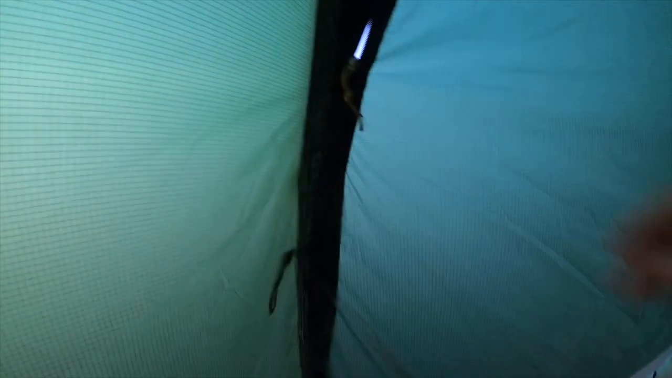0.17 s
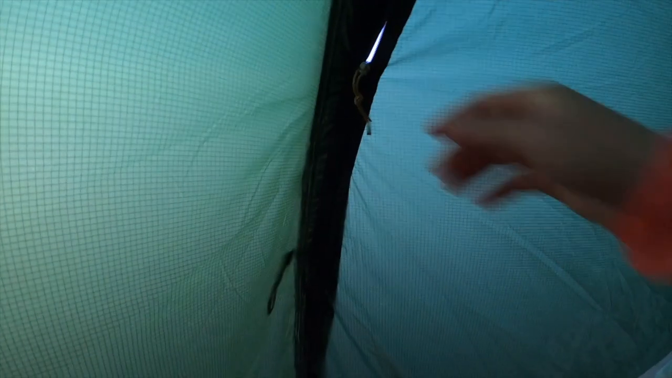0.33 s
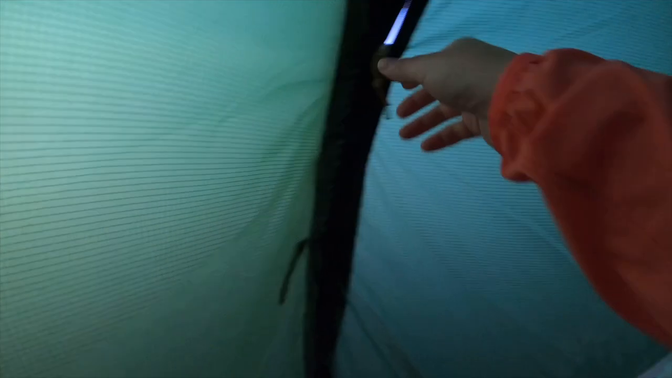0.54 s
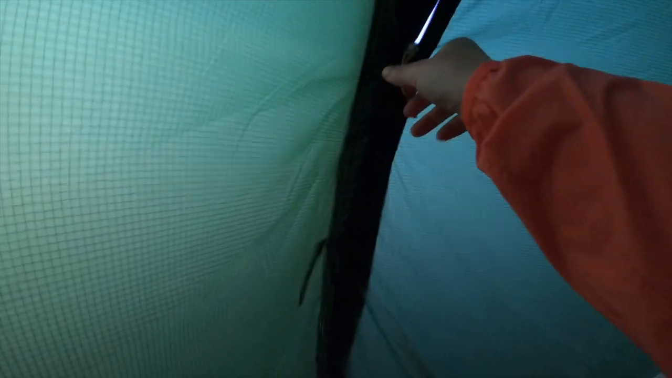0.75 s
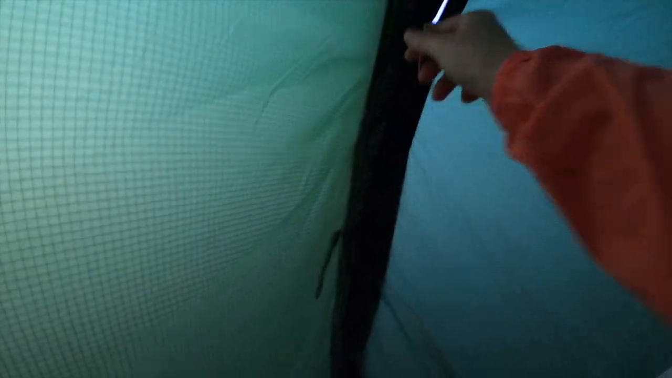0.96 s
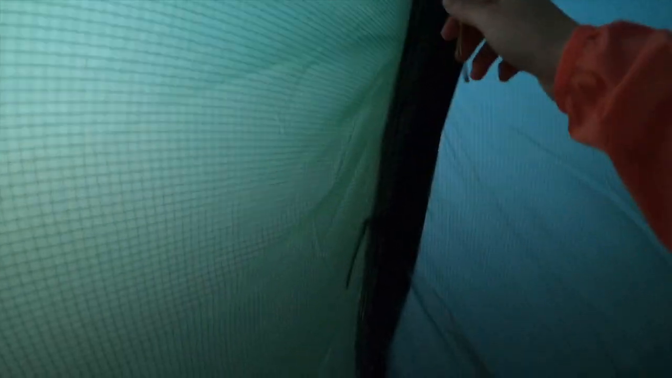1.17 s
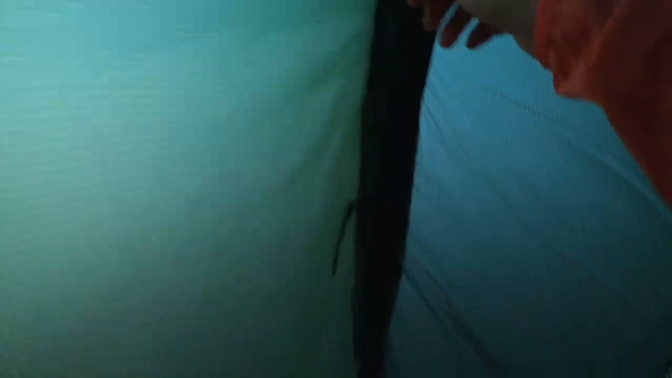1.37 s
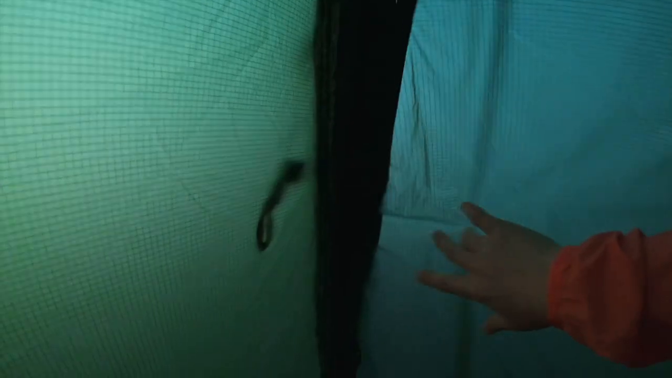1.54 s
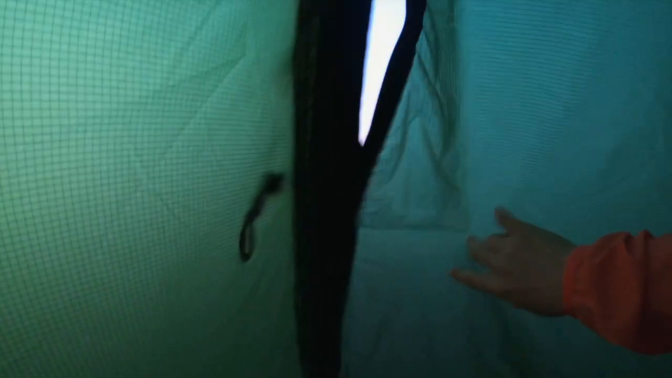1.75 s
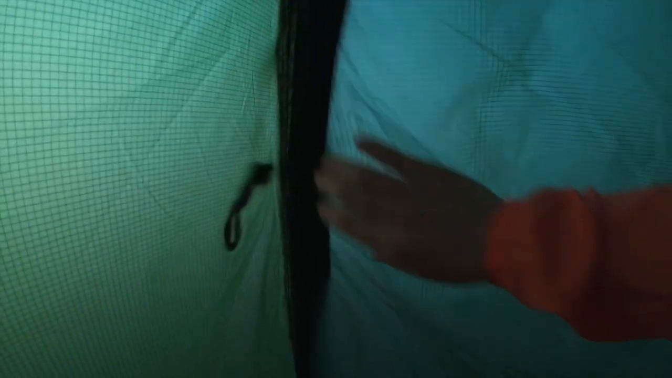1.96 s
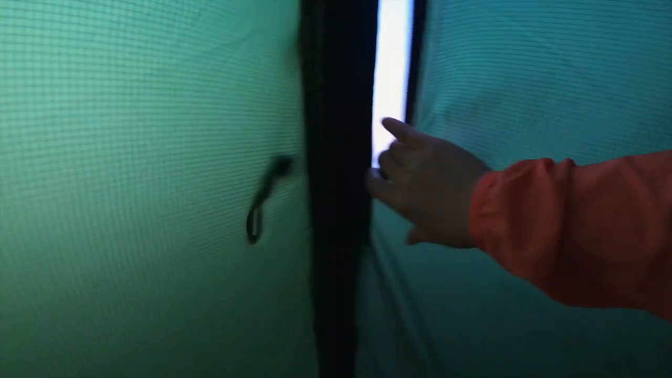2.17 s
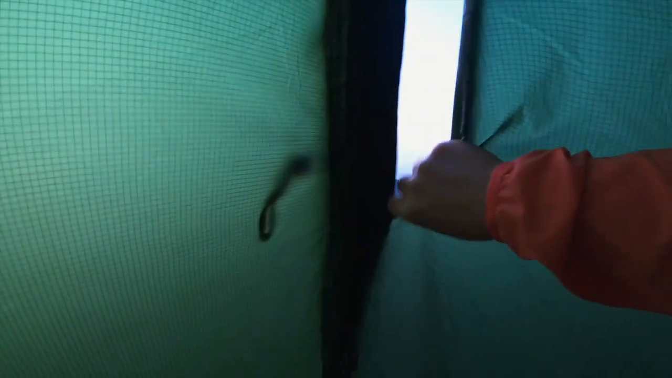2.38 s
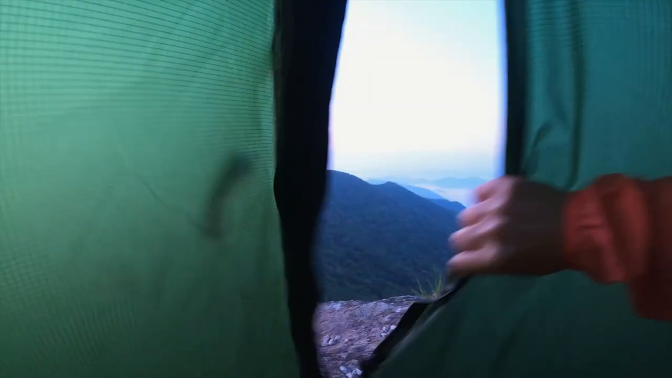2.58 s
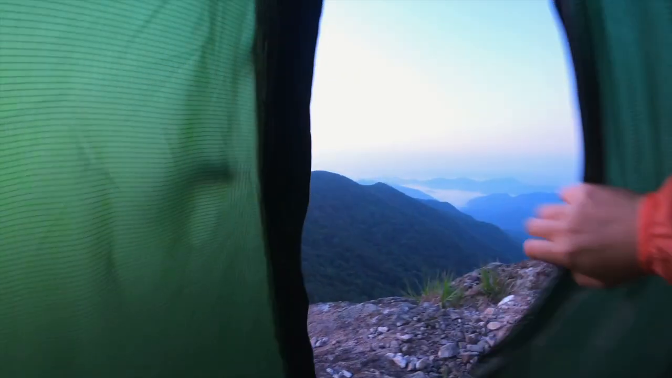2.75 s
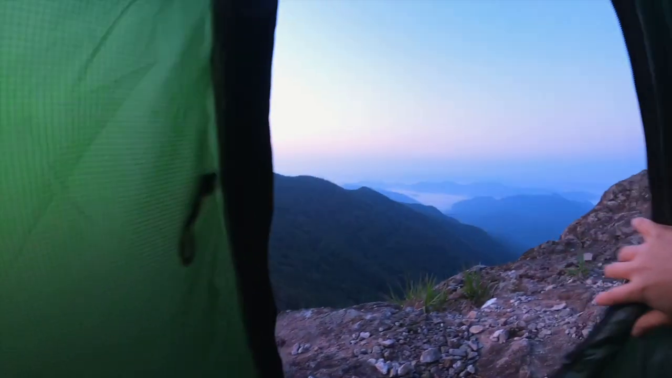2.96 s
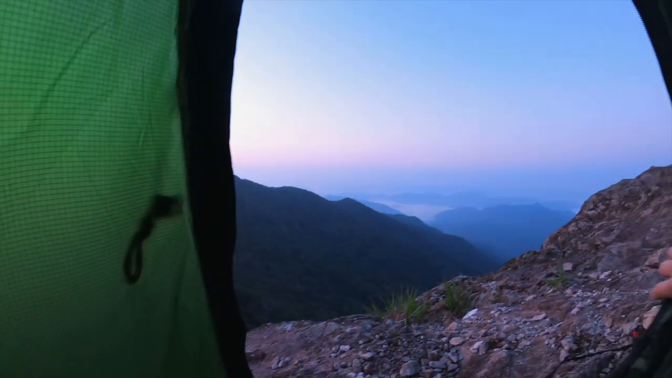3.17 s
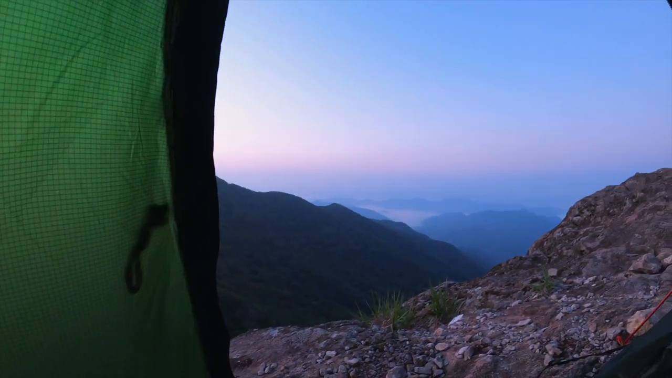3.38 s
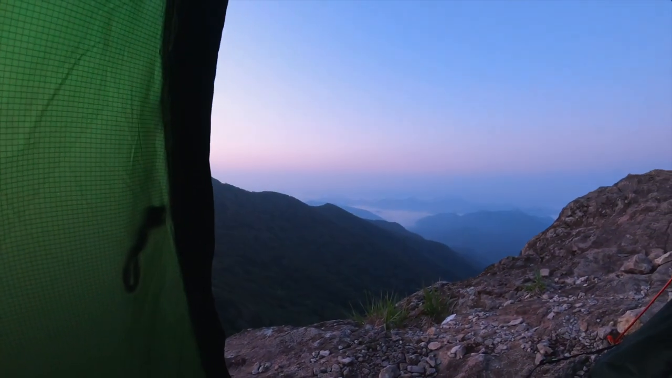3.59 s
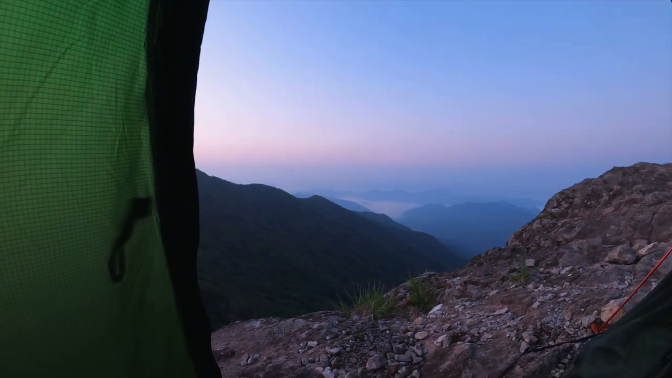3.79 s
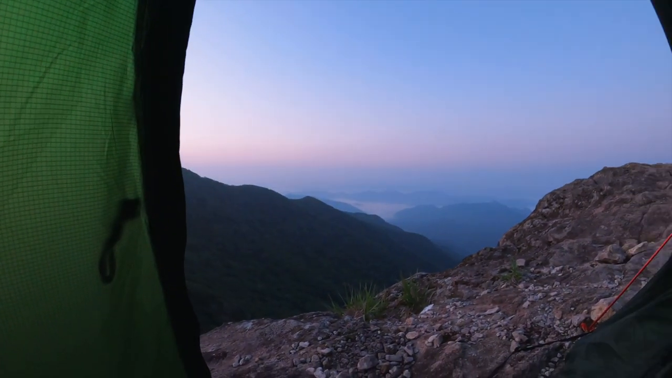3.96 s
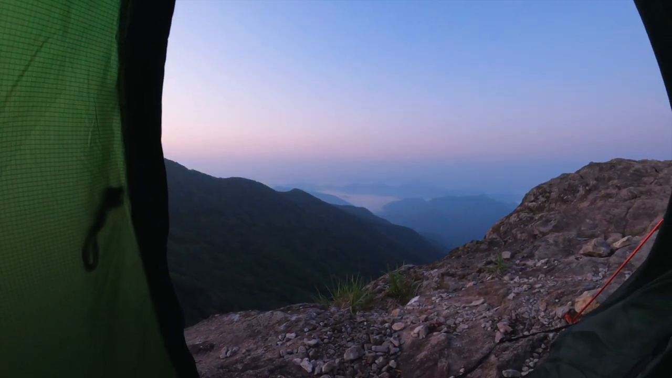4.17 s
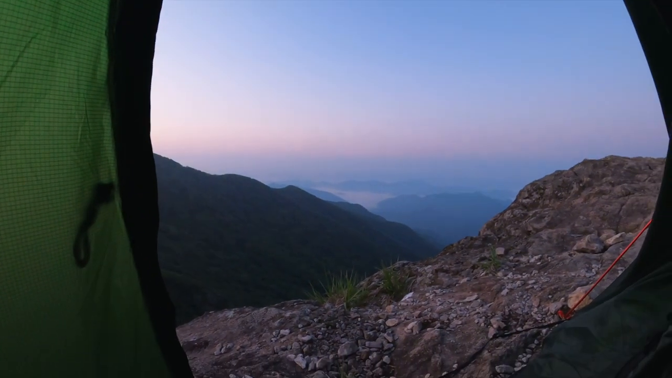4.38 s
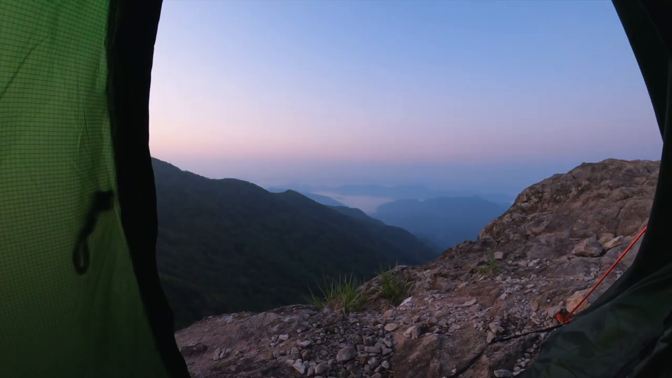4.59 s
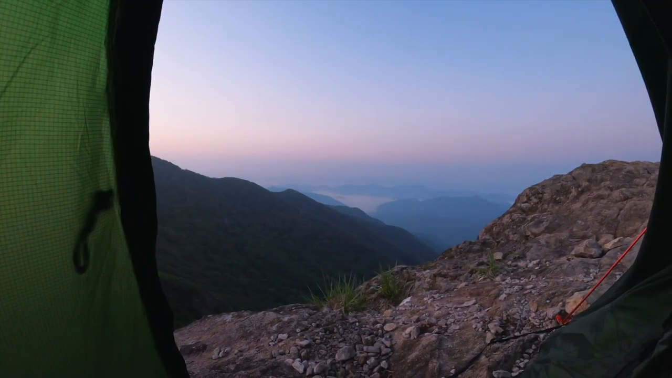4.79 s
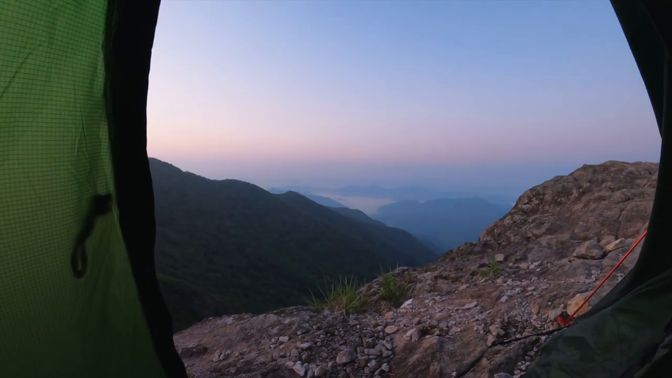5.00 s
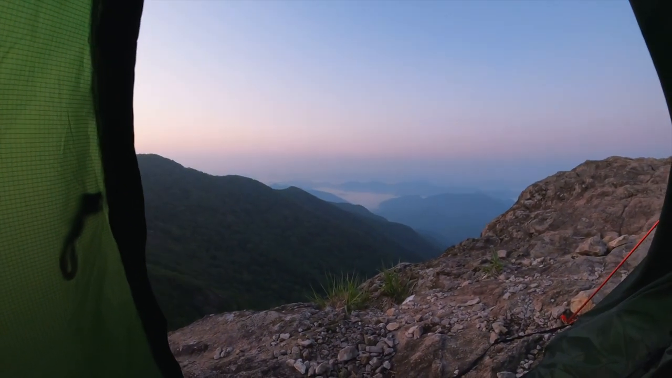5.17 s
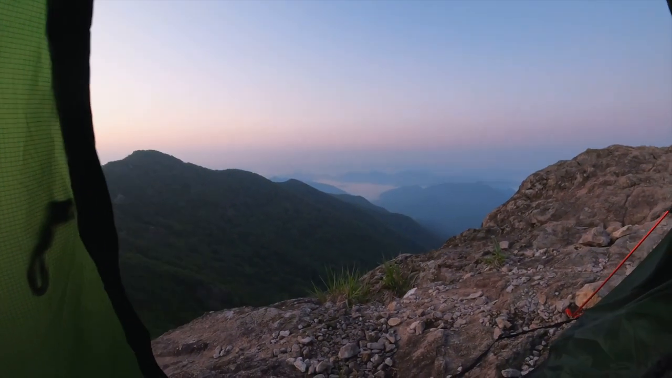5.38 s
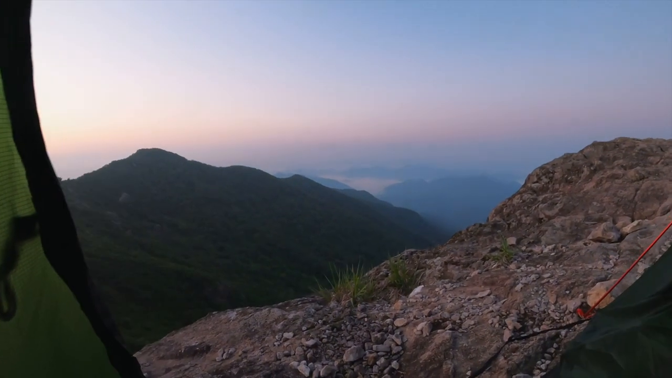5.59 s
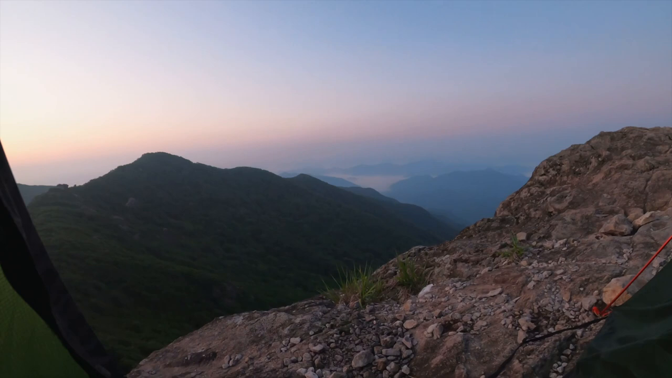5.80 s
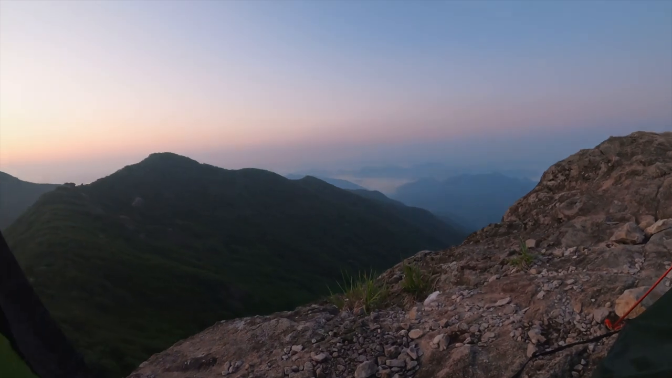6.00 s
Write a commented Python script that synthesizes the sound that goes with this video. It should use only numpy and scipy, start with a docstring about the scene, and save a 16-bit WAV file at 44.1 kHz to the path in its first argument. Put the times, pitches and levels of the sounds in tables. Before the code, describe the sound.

Quiet birdsong and faint nylon rustle, then a tent zipper rips open in sharp snapping bursts with booming, flapping cloth, settling back to soft swishes and birds.

```python
"""Sharp zipper snaps and booming, swishing nylon: a hand shakes a tent door and parts it, birds calling beyond.
Snaps are bursts of damped sines with a noise crack and rattle, one per tooth that the slider jerks over.
Cloth is shaped stereo noise swelling with each tug; its crackles and low knocks are clumps of damped grains.
Songbirds are gliding sines with a faint decaying smear from the mountain slope."""
import sys
import numpy as np
from scipy import signal
from scipy.fft import rfft, irfft, next_fast_len
from scipy.io import wavfile
from scipy.ndimage import uniform_filter1d, map_coordinates

SR = 44100
rng = np.random.default_rng(int(sys.argv[2]) if len(sys.argv) > 2 else 0)


def inscribe(sig):
    """Save sig as 16-bit PCM at rate SR to the path in sys.argv[1].

    A 1-D sig is mono; a 2-D sig holds one channel per row.
    Samples are clipped to [-1, 1] before scaling.
    """
    pcm = np.round(np.clip(np.atleast_2d(sig).T, -1, 1) * 32767)
    wavfile.write(sys.argv[1], SR, pcm.astype(np.int16))


N = 266466

# left-right balance of cloth and zipper, jumping near 1.45 s: (time [s], left over right [dB])
SIDE_DB = [(0, -7.5), (1.15, -7.5), (1.44, -9.5), (1.46, -0.5), (2.9, -0.5), (5.2, 0.5), (6.04, 4)]


def amp(db):
    """dB to gain."""
    return 10 ** (np.asarray(db) / 20)


def unit(x):
    """Scaled to rms 1."""
    return x / np.sqrt(np.mean(x ** 2) + 1e-20)


def along(points, hz):
    """(Hz, value) points interpolated on a log frequency axis."""
    f, v = np.transpose(points)
    return np.interp(np.log(hz + 1), np.log(f + 1), v, left=v[0], right=v[-1])


def curves(rows):
    """One value per sample for each column after the time."""
    s, *cols = np.transpose(rows)
    return [np.interp(np.arange(N) / SR, s, c) for c in cols]


def wobble(knots_per_s):
    """A smooth random curve through normal-distributed knots."""
    knots = rng.standard_normal(int(N * knots_per_s / SR) + 4)
    return map_coordinates(knots, [np.arange(N) * knots_per_s / SR])


def filtered(x, response):
    """x times a response of frequency."""
    m = next_fast_len(N + 8192)
    return irfft(rfft(x, m) * response(np.fft.rfftfreq(m, 1 / SR)), m)[..., :N]


def zipper():
    """Each tooth snaps as the slider passes; the snaps share the left-right balance and one treble roll-off."""
    # ring pitch sinks through the fast run, then partly recovers: (time [s], ring pitch [factor])
    ring_pitch_curve = [(0, 1.2), (2.46, 1.08), (2.49, 0.86), (2.55, 0.77), (2.7, 0.954)]
    # treble of all snaps: (frequency [Hz], gain [dB])
    snap_top = [(7000, 0.5), (8200, -14.5), (12000, -18), (15000, -22), (16000, -36)]
    out = np.zeros((2, N + SR))
    pan_db, ring_pitch = curves(SIDE_DB)[0], curves(ring_pitch_curve)[0]
    for s, *levels_db in teeth():
        start = round(s * SR) - 16
        ports = snap(levels_db, ring_pitch[start])
        side_db = pan_db[start] + rng.normal(0, 0.8)
        out[:, start:start + ports.shape[1]] += ports * amp(np.array([[.5], [-.5]]) * side_db)
    return filtered(out[:, :N], lambda hz: amp(along(snap_top, hz)))


def teeth():
    """A jerk drags the slider over one tooth or several in a row: (s, body dB, ring dB, knock dB)."""
    # slider jerks and lone snaps: (time [s], length [s], body [dB], ring [dB], knock [dB]), relative levels
    jerks = [(0.28, 0.0013, -33.5, -54, -65), (0.5075, 0.0014, -32.5, -45, -62),
             (0.5358, 0.0018, -31.5, -38.5, -33.5), (0.6718, 0.0017, -15.5, -17, -11.5),
             (0.7525, 0.0029, -40, -39, -35.5), (1.0771, 0.00076, -31.5, -57, -42.5),
             (1.462, 0.0019, -32, -37, -23.5), (1.4934, 0.00033, -19, -36, -26),
             (1.5152, 0.00096, -18, -53, -22.5), (1.6195, 0.0031, -25, -33, -27),
             (1.835, 0.000015, -28, -50, -24.5), (1.876, 0.001, -32, -27.5, -55),
             (2.065, 0.0015, -22, -26, -47), (2.1085, 0.0021, -24, -25, -27),
             (2.162, 0.00043, -36, -20, -12.5), (2.196, 0, -22, -35, -11), (2.222, 0, -40, -40, -18),
             (2.2691, 0.00097, -6, -12.5, -6.5), (2.2869, 0.0023, -3.5, -4, -23),
             (2.3185, 0, -34, -21, -47), (2.347, 0.00022, -7.5, -5.5, -39), (2.3586, 0.0019, -2.5, -2, -20),
             (2.3706, 0, -19, -15, -42), (2.375, 0, -20.5, -16, -53), (2.3824, 0.002, -5, -3, -15.5),
             (2.4265, 0, -5.5, -1.5, -27.5), (2.4389, 0, -10, 0.5, -38.5), (2.4465, 0.0017, -1.5, 3, -18),
             (2.4593, 0.0021, -4.5, 0.5, -16), (2.4681, 0.002, -8.5, 2, -10),
             (2.4736, 0.00088, -3, 0, -31.5), (2.476, 0.0026, -5.5, -0.5, -20.5), (2.4919, 0, -16, 0, -9.5),
             (2.495, .004, -7.5, -8.5, -17), (2.5065, 0.0017, -18, -12.5, -40),
             (2.5166, 0, -8.5, -6.5, -20), (2.518, 0.0012, -2, 1.5, -21.5), (2.5289, 0, -9, -6, -17.5),
             (2.53, 0.0016, -1.5, -0.5, -8.5), (2.5336, 0.0042, -9, -9.5, -10.5),
             (2.5403, 0.00077, -5.5, -10, -13), (2.543, 0.0024, -5, -11, -6.5),
             (2.7, 0.0007, -14.5, -38, -25), (2.7067, 0.0008, -13.5, -7.5, -22),
             (2.762, 0.00097, -17.5, -15, -35), (2.7687, 0.0034, -9.5, -13.5, -12.5),
             (2.777, 0, -7, -14, -20), (2.7796, 0.0012, -13.5, -21, -14), (2.973, 0.0015, -28, -8.5, -33),
             (4.584, 0.0036, -42.5, -44, -50), (5.988, 0.01, -40.5, -52, -41.5)]
    tooth_s, fade_db_per_tooth, scatter_db = .002, 0.1, 0.95
    passed = []
    for s, length_s, *levels_db in jerks:
        for k in range(1 + int(length_s / tooth_s + .4)):
            tooth_time_s = s + k * tooth_s * rng.uniform(0.92, 1.15)
            scatter = scatter_db * rng.standard_normal(size=3)
            passed.append((tooth_time_s, *(np.array(levels_db) - k * fade_db_per_tooth + scatter)))
    return passed


def snap(levels_db, ring_factor):
    """The tooth strikes twice: slider, tooth and tape ring a few cycles, then the cloth rattles briefly."""
    # body, ring, knock: (pitch [Hz], pitch scatter [share], damping length [cycles])
    snap_parts = [(2200, 0.16, 1.34), (5310, 0.04, 3.035), (800, 0.17, 0.85)]
    t = np.arange(SR // 40) / SR
    ports = np.zeros((2, len(t)))
    second = np.maximum(t - rng.uniform(.0003, .0007), 0)
    for since, strike_db in ((t, -1.5), (second, -8)):
        for db, (hz, scatter, cycles) in zip(levels_db, snap_parts):
            # only the ring follows the pitch curve
            f = hz * (ring_factor if hz > 3000 else 1) * np.exp(scatter * rng.standard_normal())
            u = 3.65 * since * f / cycles
            # the slider is nearer the right port
            lag_rad = rng.normal(-0.00001, 4e-6) * 2 * np.pi * hz
            phase = 2 * np.pi * (f * since + rng.random()) + np.array([[lag_rad], [-lag_rad]])
            # the microphone body shades the left port in the treble
            lean = amp(np.array([[-hz], [hz]]) / 4000)
            ports += amp(db + strike_db) * lean * u * np.exp(1 - u) * np.sin(phase)
    crack = amp(levels_db[1] - 17.5 - 60 * t / 0.0028) * rng.standard_normal((2, len(t)))
    rattle = rng.standard_normal(len(t)) + 0.11 * rng.standard_normal((2, len(t)))
    rattle = signal.lfilter([1, 0, -1], [1, -.9, .35], rattle)  # broad band of the tape
    return ports + crack + amp(max(levels_db[:2]) - 23 - 60 * t / 0.02) * rattle


def cloth():
    """Swish, hiss and sizzle of sliding nylon share tugs; crease pops roughen them; the wall flaps and booms."""
    # nylon on nylon: (time [s], swish [dB], hiss over swish [dB]), before the trims below
    rustle = [(0, -62.5, 6.5), (.12, -55.5, 6), (.55, -54.5, 6), (.75, -54.5, -2.5), (.92, -54, 4.5),
              (.97, -56, -0.5), (1.15, -54.5, -3), (1.3, -66.5, -1.5), (1.447, -58, 4), (1.474, -39.5, -5),
              (1.64, -37.5, -2.5), (1.7, -39, -1.5), (1.8, -41, -5.5), (1.888, -55.5, -6), (1.93, -47.5, 1),
              (2.12, -47, -9.5), (2.22, -45, -2), (2.42, -38, -1), (2.62, -43, 1), (2.85, -37, 0),
              (3.12, -41, -4), (3.27, -38.5, 1.5), (3.41, -48.5, 1.5), (3.64, -44, -3), (4.08, -44.5, -2.5),
              (4.15, -52, -5), (4.55, -60, -8), (5.13, -58, -2.5), (5.4, -47.5, -4), (5.8, -42, -3),
              (6.04, -48.5, -1.5)]
    # taut wall between tugs: (time [s], boom [dB], flap [dB])
    wall = [(0, -76, -64.5), (.3, -82, -64.5), (.6, -78, -60.5), (1.44, -73, -66.5), (1.47, -68, -55.5),
            (2.6, -51, -50), (3.1, -65, -55), (4.9, -61.5, -61), (5.8, -60, -54.5), (6.04, -71, -54)]
    # fine fibre sizzle: (time [s], level over hiss_db [dB])
    sizzle_curve = [(0, -23), (1.44, -25.5), (1.46, -16), (2.1, -16), (2.6, -18), (4.1, -18.5), (4.6, -11),
                    (5.2, -18), (6.04, -14)]
    # colours of the six layers: (frequency [Hz], relative density [dB per Hz])
    swish_colour = [(500, -54), (900, -13.5), (1050, -2), (2000, -1), (3500, -1), (4300, -9), (6000, -35.5)]
    hiss_colour = [(2500, -49.5), (3700, -2.5), (4500, 0.5), (6000, -1), (7000, -8.5), (7900, -18),
                   (9000, -52.5)]
    fibre_colour = [(6500, -29), (8000, 5.5), (13500, -9), (15200, -21.5), (16000, -29)]
    crumple_colour = [(90, -5.5), (170, 10), (350, -1), (900, -8), (2000, -6), (3300, -13.5), (4500, -37.5),
                      (6300, -7), (7600, -17.5), (9000, -36.5)]
    flap_colour = [(90, -48), (150, -0.5), (300, -2.5), (500, -7.5), (800, -10.5), (1200, -14), (2000, -63)]
    boom_colour = [(10, -4), (25, 2), (60, 3), (110, -1), (160, -8.5), (300, -56.5)]

    shake_hiss_db = 4  # hiss over swish during shakes, before trims
    slide_db, bright_db = curves(rustle)
    swish_db = shaken(slide_db, column=5)
    hiss_db = shaken(slide_db + bright_db - shake_hiss_db, column=5) + shake_hiss_db
    calm_boom_db, calm_flap_db = curves(wall)
    boom_db = shaken(calm_boom_db, column=3)
    flap_db = shaken(calm_flap_db, column=4)
    sizzle_db = hiss_db + curves(sizzle_curve)[0]
    # cloth gripped next to the microphone grows faster than the shaking itself
    crumple_db = flap_db + 2.5 + 0.38 * (flap_db + 25.5)

    # hard shaking folds the cloth, so the pops stand out more
    folding = np.clip((flap_db + 59.5) / 25, .15, 1)
    tug = amp(1.82 * wobble(25))
    coarse = creases(pops_per_s=240, spread_db=3) ** folding
    fine = creases(pops_per_s=210, spread_db=0.0) ** folding

    crumple = amp(crumple_db) * rub(crumple_colour, grain_db=5, grains_per_s=250, patchy_db=-1.0, width=0.13)
    swish = amp(swish_db - 2.0) * rub(swish_colour, grain_db=0.5, grains_per_s=290, patchy_db=2.0, width=0.67)
    hiss = amp(hiss_db - 1.0) * rub(hiss_colour, grain_db=0.0, grains_per_s=2800, patchy_db=2.0)
    sizzle = amp(sizzle_db) * rub(fibre_colour, grain_db=-1.0, grains_per_s=780, patchy_db=1.0, width=1.08)
    flap = amp(np.minimum(flap_db, -36)) * rub(flap_colour, grain_db=2.0, grains_per_s=55, patchy_db=1.5)
    boom = amp(boom_db) * rub(boom_colour, grain_db=0.5, grains_per_s=26, patchy_db=0.9, width=0.27)

    sliding = tug * (coarse * swish + fine * (hiss + sizzle))
    pan_db = curves(SIDE_DB)[0]
    return (sliding + crumple + flap + boom) * amp(np.array([pan_db, -pan_db]) / 2)


def rub(colour, grain_db, grains_per_s, patchy_db, width=1):
    """Stereo friction noise: many tiny slips of uneven size, in patches of random colour."""
    # (frequency [Hz], left-right correlation at width 1)
    alike = [(100, 0.92), (900, 0.88), (2000, 0.23), (4000, 0.085), (8000, 0.12)]
    slips = rng.standard_normal((2, N)) * amp(grain_db * wobble(grains_per_s))
    z = signal.stft(slips, nperseg=512)[2]
    field = uniform_filter1d(rng.standard_normal(z.shape[1:]), 6, axis=0)
    field = uniform_filter1d(field, 8, axis=1)
    pair = signal.istft(z * amp(patchy_db * unit(field)), nperseg=512)[1][:, :N]

    def mid_side_response(hz):
        """A wider angle puts more of the noise in the side signal."""
        angle = width * np.arccos(np.clip(along(alike, hz), -1, 1)) / 2
        return amp(along(colour, hz)) * [np.cos(angle), np.sin(angle)]

    mid, side = filtered(pair, mid_side_response)
    return unit(np.array([mid + side, mid - side]))


def creases(pops_per_s, spread_db):
    """Sparse pops of folding cloth: a gain that jumps at random moments and dies in a few ms."""
    pops = (rng.random(N) < pops_per_s / SR) * amp(spread_db * rng.exponential(size=N))
    decay = amp(-60 * np.arange(SR // 50) / SR / 0.01)
    return 1 + signal.fftconvolve(pops, decay)[:N]


def shaken(steady_db, column):
    """Level in dB of a steady sound plus the power of one swell for each tug."""
    # door tugs: (time [s], rise [s per 20 dB], fall [s per 20 dB], boom [dB], flap [dB], swish [dB])
    shakes = [(.673, 0.034, 0.064, -37, -44, -47.5), (1.469, 0.012, 0.046, -19.5, -38, -48.5),
              (1.587, 0.12, 0.15, -36, -39.5, -56), (1.851, 0.14, 0.061, -67, -48, -73),
              (2.023, 0.029, 0.14, -43.5, -53, -47), (2.106, 0.043, 0.23, -28.5, -33.5, -56.5),
              (2.174, 0.082, 0.11, -21, -26.5, -40), (2.288, 0.011, 0.036, -42, -36, -30.5),
              (2.361, 0.012, 0.057, -49, -37.5, -30.5), (2.385, 0.013, 0.031, -50.5, -29.5, -34),
              (2.447, 0.013, 0.052, -34, -21.5, -44), (2.476, 0.025, 0.049, -23.5, -21.5, -25),
              (2.536, 0.027, 0.037, -13.5, -18, -29.5), (2.585, 0.069, 0.13, -30, -38.5, -49),
              (2.706, 0.03, 0.057, -34, -37.5, -38), (2.774, 0.13, 0.08, -28.5, -30, -32.5),
              (2.898, 0.045, 0.16, -48.5, -40.5, -51), (2.968, 0.084, 0.17, -38, -45, -35.5),
              (3.912, 0.017, 0.2, -50, -54.5, -63), (4.0, 0.08, 0.066, -50, -61, -51)]
    power, t = amp(2 * steady_db), np.arange(N) / SR
    for row in shakes:
        s, rise, fall = row[:3]
        near = slice(round((s - 3 * rise) * SR), round((s + 3 * fall) * SR))
        late = t[near] - s
        swell_db = row[column] - 20 * np.maximum(late / fall, -late / rise)
        power[near] += amp(2 * swell_db)
    return 10 * np.log10(power)


def crackles_and_knocks():
    """Cloth crackles and low knocks: each is a clump of short damped grains of scattered pitch and size."""
    # (time [s], length [s], centre pitch [Hz], clump rms before panning [dB])
    clump_rows = [(0.619, 0.046, 1660, -50.5), (0.692, 0.023, 990, -46.5), (0.858, 0.046, 1530, -51),
                  (0.902, 0.037, 1750, -51), (1.076, 0.017, 2560, -49.5), (1.553, 0.072, 1490, -52),
                  (2.097, 0.055, 1800, -38.5), (2.149, 0.056, 1370, -30.5), (2.851, 0.039, 1360, -41.5),
                  (3.171, 0.097, 341, -50.5), (5.441, 0.0088, 329, -51.5), (5.632, .012, 310, -56),
                  (5.701, .014, 340, -50.5), (5.735, 0.0072, 300, -52), (5.759, .008, 383, -49),
                  (5.852, .01, 432, -51.5), (6.006, .012, 201, -61)]
    grains_per_s, grain_cycles, grain_spread = 3000, 1.83, 0.24
    out, t = np.zeros(N + SR), np.arange(SR // 100) / SR
    for s, length_s, hz, db in clump_rows:
        clump = np.zeros(round(length_s * SR) + len(t))
        for when, size, tone in rng.random((int(length_s * grains_per_s), 3)):
            f = hz * np.exp(grain_spread * 4 * (tone - .5))
            u = 2 * t * f / grain_cycles
            grain = u * np.exp(-u) * np.sin(2 * np.pi * f * t)
            grain = grain * amp(-2.5 * np.log(size + 0.0059))  # few large, many small
            clump[int(when * length_s * SR):][:len(t)] += grain * np.sin(np.pi * when)
        out[round(s * SR):][:len(clump)] += amp(db) * unit(clump)
    pan_db = curves(SIDE_DB)[0]
    return out[:N] * amp(np.array([pan_db, -pan_db]) / 2)


def birds(notes, waver_rad, waver_per_s):
    """Gliding whistles from scattered directions, with a faint smear from the slope."""
    out, waver = np.zeros((2, N)), wobble(waver_per_s)
    for s, length_s, *hz, db in notes:
        u = np.linspace(0, 1, round(length_s * 1.15 * SR))  # room for the soft ends
        glide_hz = np.polyval(np.polyfit([0, .5, 1], hz, 2), u)
        phase = 2 * np.pi * np.cumsum(glide_hz) / SR
        phase += waver_rad * waver[round(s * SR):][:len(u)]
        bearing_rad = rng.uniform(-0.78, 0.44)
        ports = np.sin(phase + np.array([[bearing_rad], [-bearing_rad]]))
        note = amp(db) * np.sin(np.pi * u) ** 0.48 * ports
        out[:, round((s - length_s * .07) * SR):][:, :len(u)] += note
    out *= amp(2.2 * wobble(90))  # moving air makes far notes flutter
    t = np.arange(SR // 2) / SR
    slope = rng.standard_normal((2, len(t))) * amp(-60 * t / 0.5)
    smear = signal.fftconvolve(out, slope / np.linalg.norm(slope[0]), axes=1)[:, :N]
    return out + amp(-6.5) * smear


def scene():
    """Everything that reaches the two microphone ports."""
    # (time [s], nominal length [s], start [Hz], middle [Hz], end [Hz], peak before flutter and smear [dB])
    clear_notes = [(0.008, 0.05, 5050, 3770, 3150, -51.5), (0.18, 0.023, 2280, 2145, 2100, -44.5),
                   (0.204, 0.035, 4850, 4300, 3780, -50), (.236, .026, 3800, 3600, 3200, -49.5),
                   (.336, 0.024, 3650, 3670, 3710, -47), (0.865, 0.015, 3800, 3850, 3780, -48),
                   (0.95, 0.023, 5820, 5500, 5300, -42), (.69, 0.024, 3130, 3060, 3050, -47),
                   (.885, .018, 3180, 3180, 3280, -54), (1.152, .02, 2280, 2130, 2070, -49.5),
                   (0.983, 0.013, 5380, 5620, 5860, -41), (1.045, 0.029, 5700, 5450, 5920, -41),
                   (1.136, 0.015, 4280, 4100, 3960, -46), (1.2, 0.12, 2480, 2450, 2390, -54),
                   (1.308, 0.027, 3630, 3880, 4150, -57), (1.332, 0.078, 4033, 4080, 3870, -51),
                   (1.335, 0.091, 2642, 2730, 2548, -54.5), (1.879, 0.025, 3042, 2784, 2850, -44),
                   (1.906, 0.029, 2570, 1860, 1490, -49), (1.901, .01, 4660, 4600, 4594, -47),
                   (3.458, 0.044, 2640, 2500, 2380, -51), (3.572, 0.028, 2800, 2786, 2784, -45.5),
                   (3.598, .05, 2080, 1980, 2030, -42), (3.798, 0.022, 2440, 2420, 2260, -45),
                   (3.809, 0.014, 3600, 3570, 3560, -45), (3.839, 0.033, 3980, 4200, 4260, -46),
                   (3.93, 0.043, 5590, 5260, 5300, -44), (4.04, 0.035, 3940, 3700, 3600, -46),
                   (4.185, 0.055, 3100, 3520, 3540, -47.5), (4.28, 0.025, 4480, 4350, 4050, -49),
                   (4.352, 0.039, 5640, 5640, 4870, -50), (4.4, 0.046, 4980, 4920, 5020, -52),
                   (4.49, 0.037, 5600, 5610, 4900, -53), (4.535, 0.047, 4940, 4950, 4900, -51.5),
                   (4.57, 0.062, 3405, 3250, 3370, -60), (4.65, 0.26, 4470, 4510, 4560, -67.5),
                   (4.652, 0.041, 3360, 3270, 3220, -58), (4.575, 0.29, 2210, 2214, 2195, -60),
                   (4.715, 0.029, 2347, 2370, 2344, -58), (5.04, 0.028, 2150, 2270, 2510, -55),
                   (4.624, 0.044, 2800, 2850, 2867, -56.5), (4.692, 0.026, 3190, 3090, 3185, -50.5),
                   (4.741, 0.05, 1520, 1855, 1805, -49), (4.789, 0.018, 4910, 5500, 5200, -52),
                   (4.808, 0.028, 5000, 4350, 3600, -53), (4.84, 0.023, 3480, 3570, 3630, -50),
                   (4.837, 0.025, 2450, 2330, 2570, -44.5), (4.862, 0.024, 3530, 3030, 2740, -53),
                   (4.864, 0.016, 2530, 2150, 1660, -48.5), (4.952, 0.034, 1470, 1697, 1497, -54),
                   (5.0, 0.034, 3480, 2400, 1705, -51.5), (5.082, 0.024, 3970, 4700, 4730, -53),
                   (5.161, 0.017, 4470, 4730, 4630, -49), (5.293, 0.037, 3280, 3210, 3154, -59)]
    # far bird with a husky, wavering voice: same columns
    husky_notes = [(0.95, 0.12, 1990, 1950, 2028, -52.5), (3.539, .055, 2090, 2040, 2000, -49.5),
                   (3.548, 0.02, 2350, 2470, 2480, -46), (3.67, 0.036, 2570, 2210, 2000, -42),
                   (3.7, 0.053, 2587, 2400, 2030, -45), (4.885, 0.12, 2505, 2500, 2510, -58),
                   (4.965, 0.061, 6240, 6400, 6270, -62)]
    clear = birds(clear_notes, waver_rad=0.42, waver_per_s=120)
    husky = birds(husky_notes, waver_rad=1.37, waver_per_s=350)
    return zipper() + cloth() + crackles_and_knocks() + clear + husky


def record(dry):
    """The input saturates smoothly towards full scale and keeps nothing above its band limit."""
    top_hz = 15900
    saturated = dry / (1 + np.abs(dry) ** 8) ** (1 / 8)
    return np.clip(filtered(saturated, lambda hz: hz < top_hz), -1, 1)


dry = scene()
out = record(dry)
inscribe(out)
```